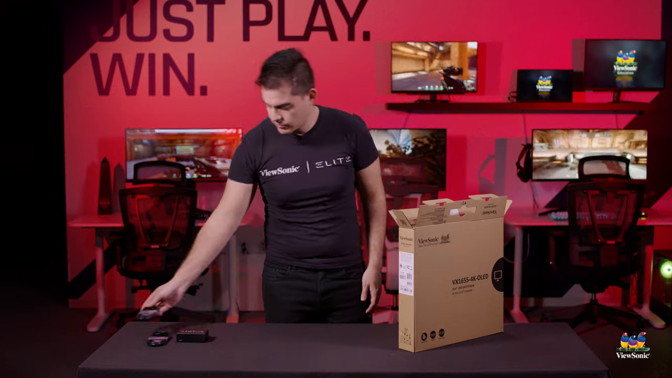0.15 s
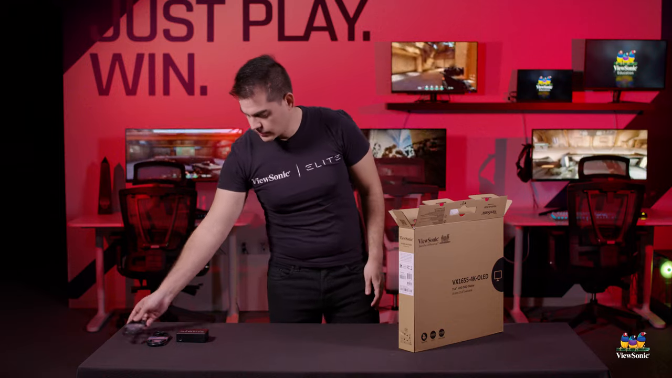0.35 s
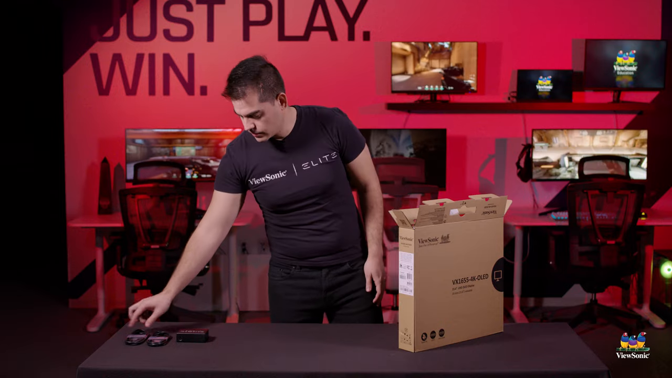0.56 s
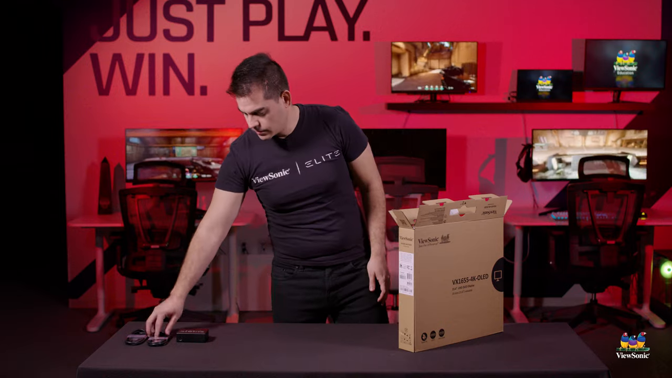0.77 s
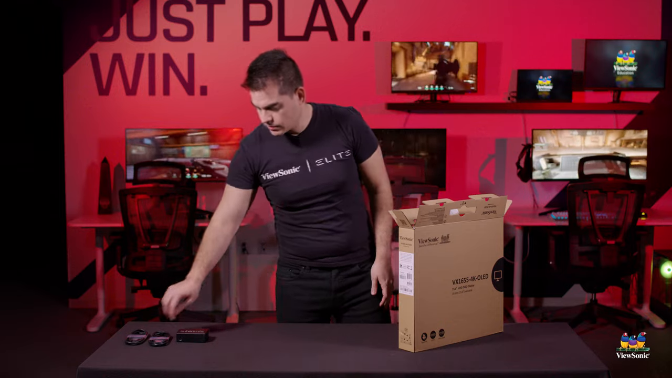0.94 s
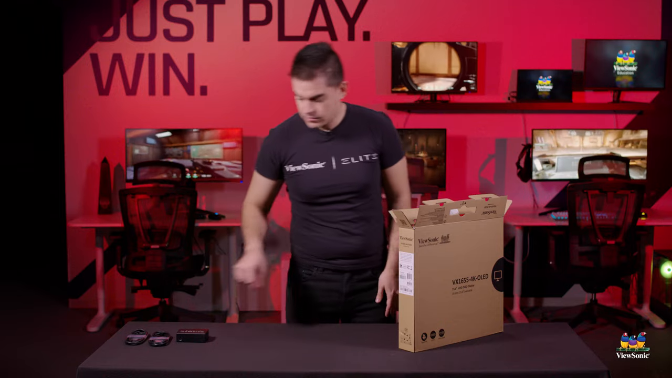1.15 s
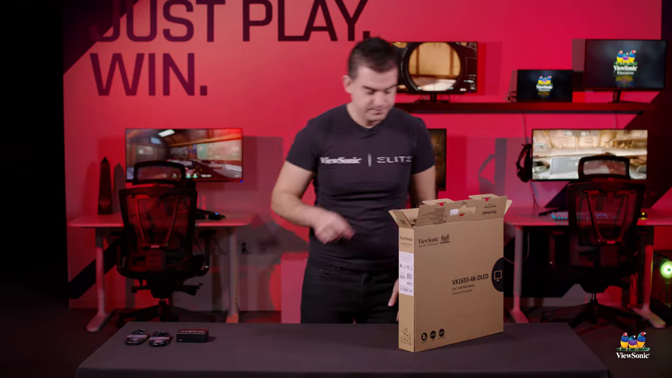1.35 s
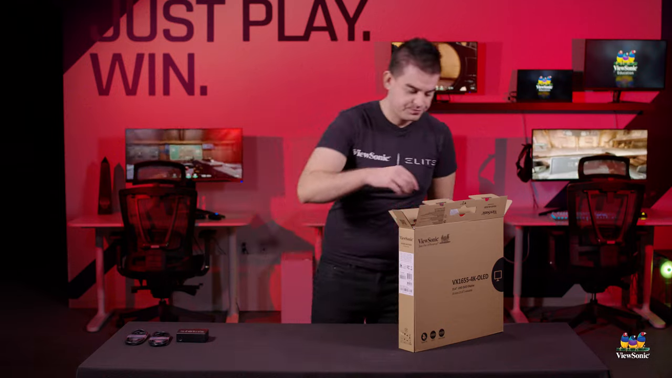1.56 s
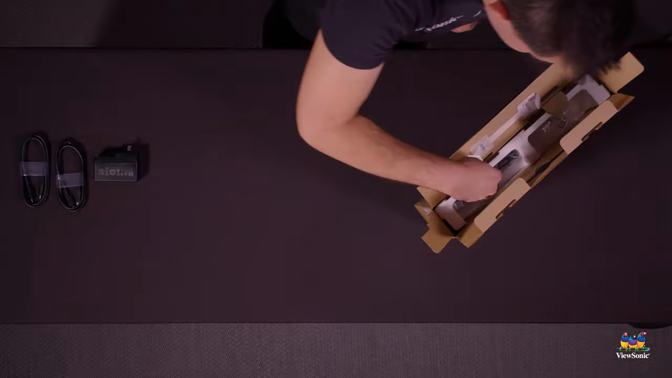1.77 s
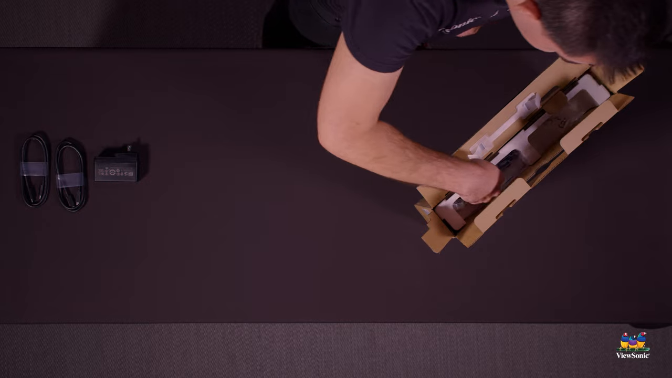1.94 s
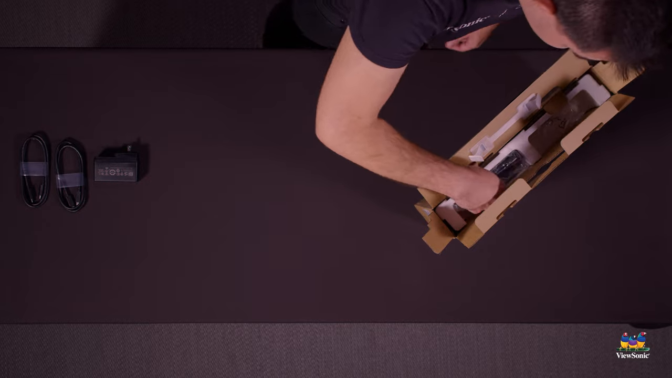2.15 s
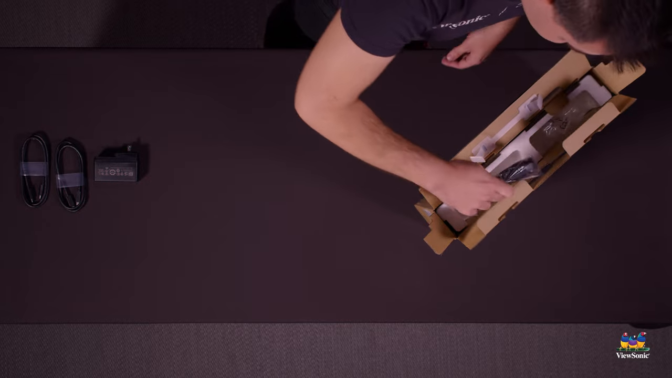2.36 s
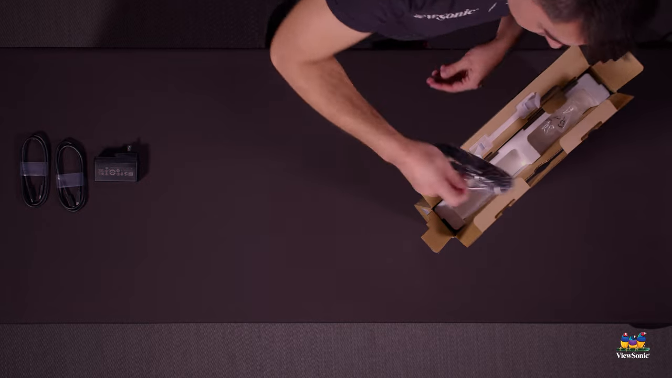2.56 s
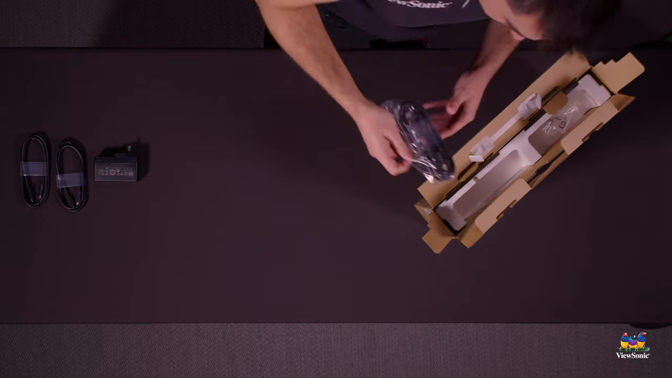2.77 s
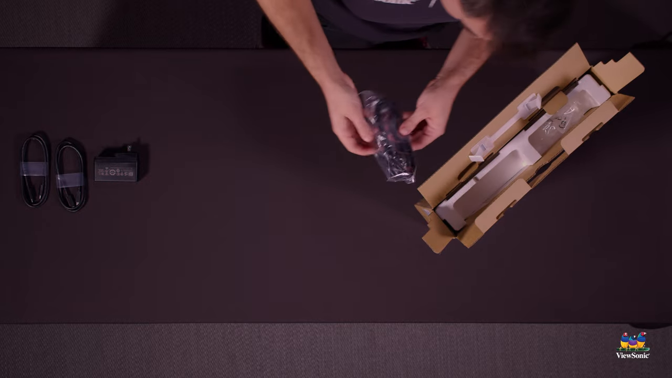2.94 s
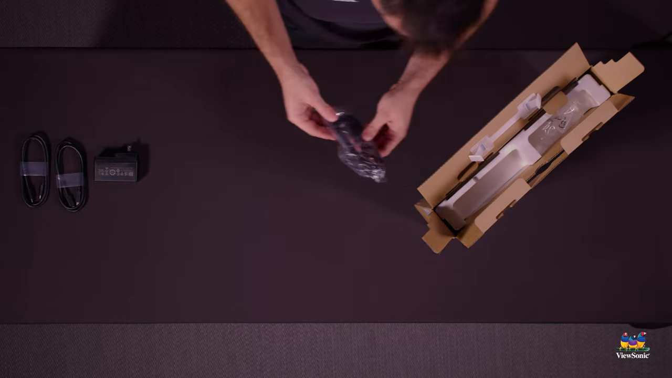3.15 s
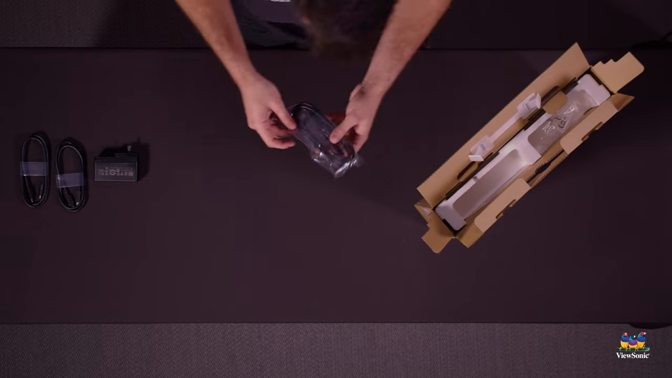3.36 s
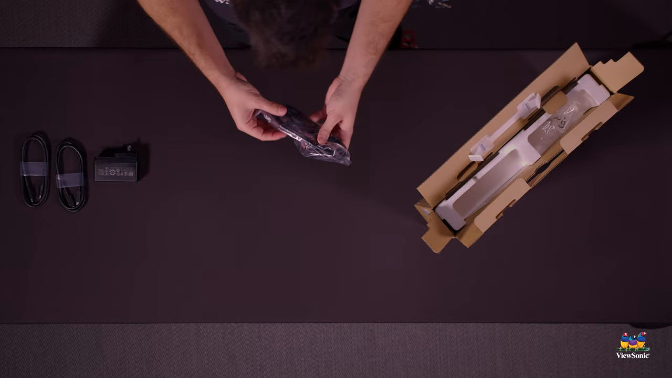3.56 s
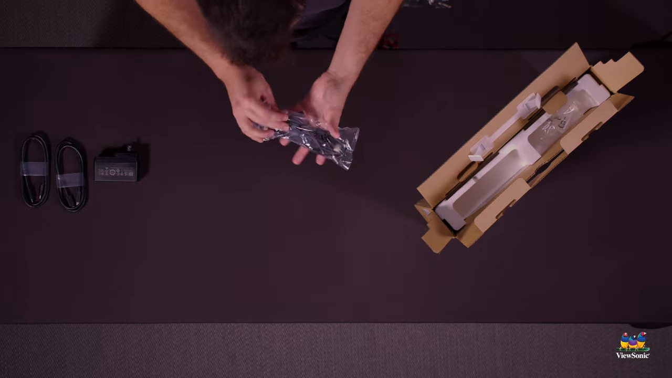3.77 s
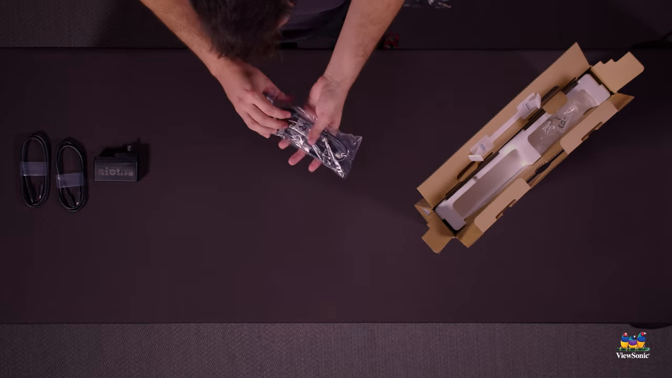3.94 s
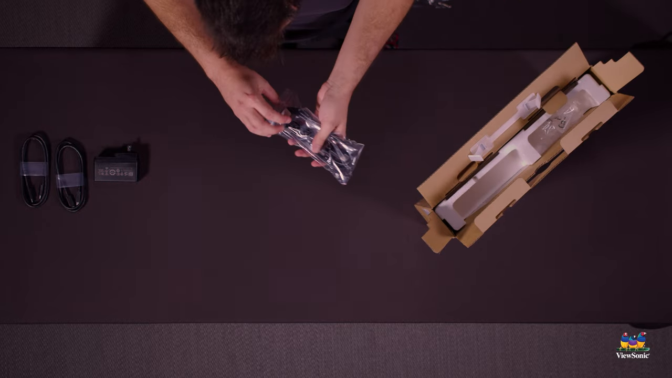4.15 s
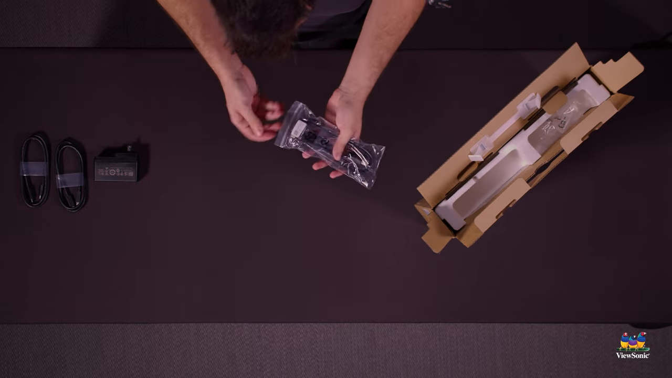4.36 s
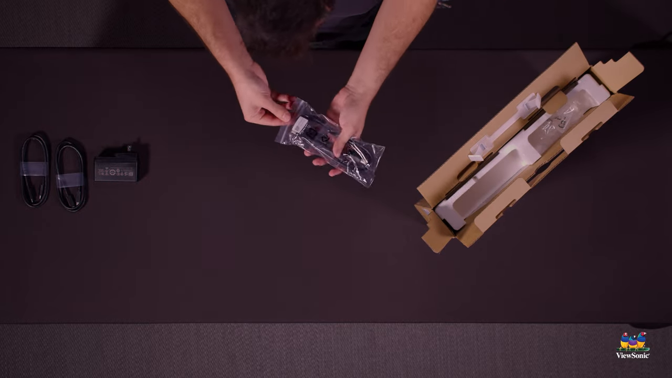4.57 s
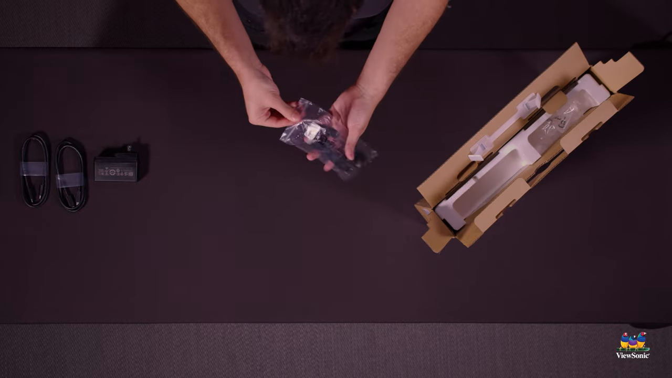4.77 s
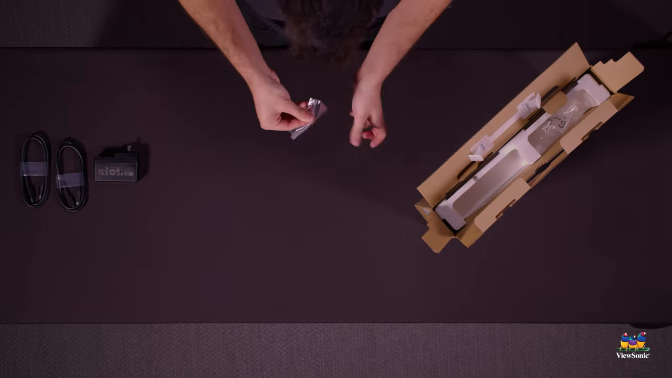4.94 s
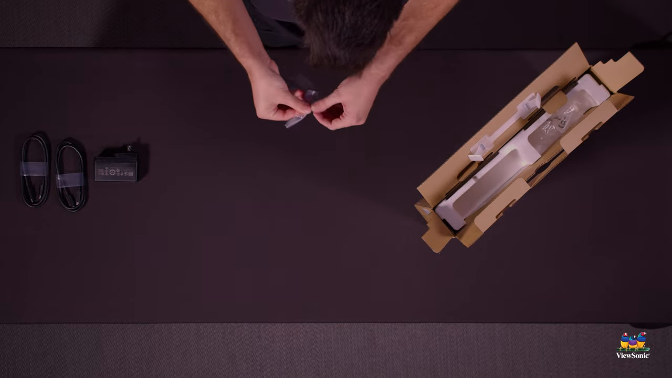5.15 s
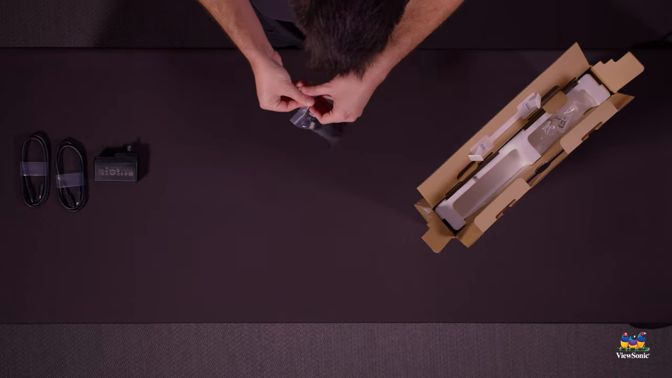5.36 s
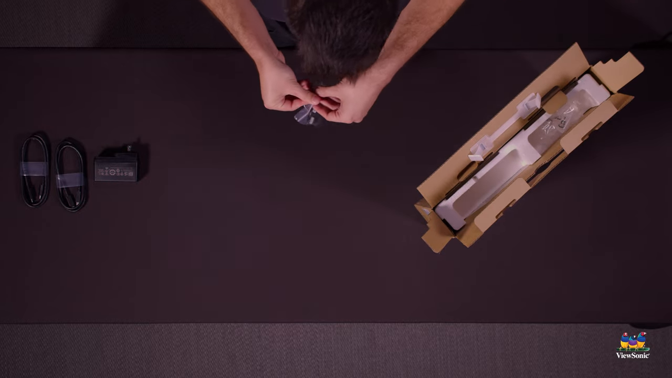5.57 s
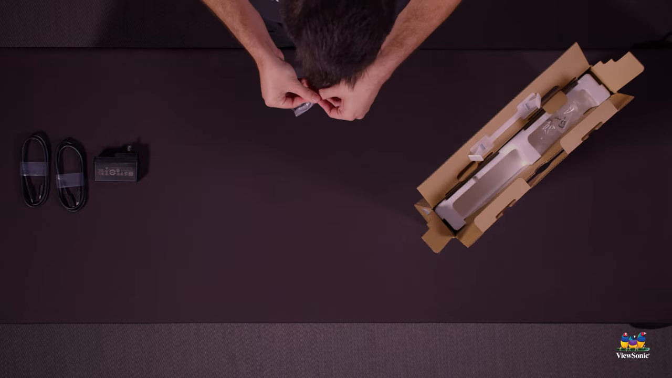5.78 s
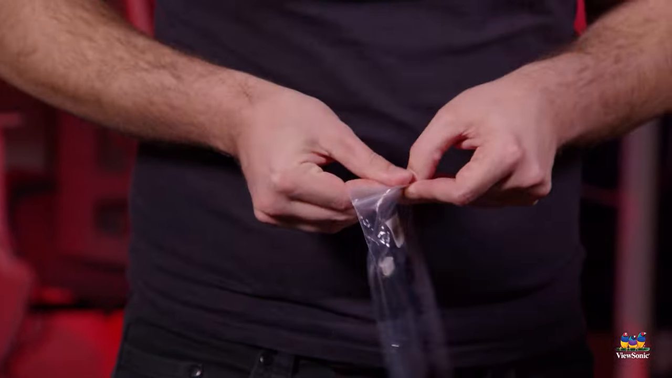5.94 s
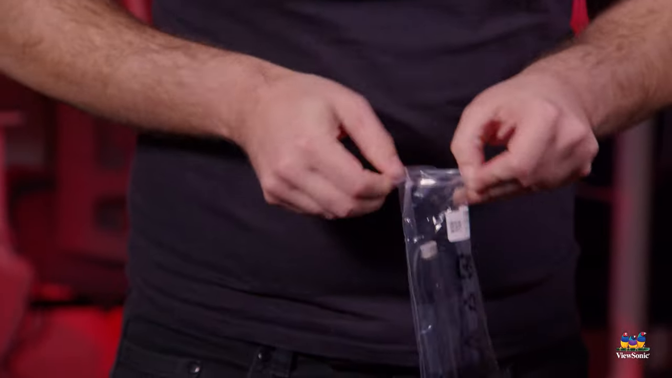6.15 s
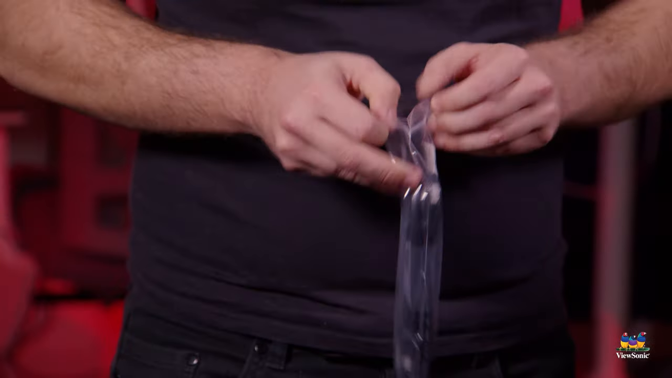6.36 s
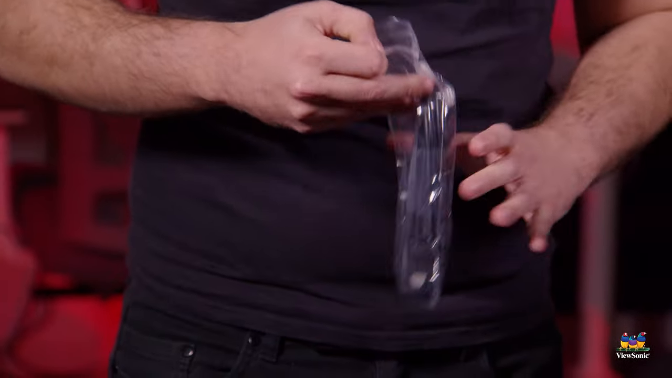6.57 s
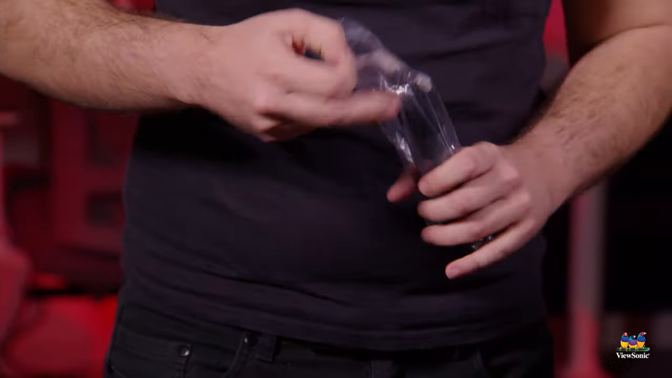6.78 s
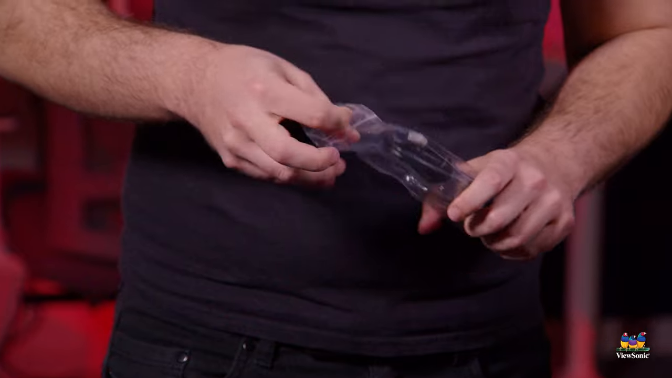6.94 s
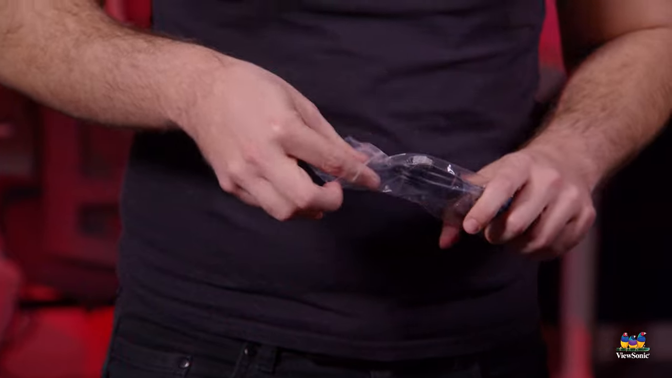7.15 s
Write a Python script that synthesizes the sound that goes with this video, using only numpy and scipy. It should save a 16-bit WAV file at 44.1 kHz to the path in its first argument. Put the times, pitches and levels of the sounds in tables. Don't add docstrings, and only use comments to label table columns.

```python
import sys
import numpy as np
from scipy import signal
from scipy.io import wavfile
from scipy.ndimage import uniform_filter1d

SR = 44100
rng = np.random.default_rng(int(sys.argv[2]) if len(sys.argv) > 2 else 0)


def voltage_ratio(decibels):
    exponent = np.asarray(decibels, float) / 20
    return 10 ** exponent


def master(y):
    cut = np.clip(np.atleast_2d(y).T, -1, 1)
    pcm = np.round(cut * 32767)
    wavfile.write(sys.argv[1], SR, pcm.astype(np.int16))


N = 317961
LEAD_S = .003


def evened(x):
    return x / np.sqrt(np.mean(x ** 2) + 1e-20)


def peaked(x):
    return x / np.sqrt(uniform_filter1d(x ** 2, size=50).max())


def read(points, hz):
    f, value = np.transpose(points)
    return np.interp(np.log(hz + 1), np.log(f + 1), value)


def curve(rows, column):
    rows = np.asarray(rows)
    return np.interp(np.arange(N) / SR, rows[:, 0], rows[:, column], -120, rows[-1, column])


def add(mix, s, sound):
    part = mix[round(s * SR):][:len(sound)]
    part += sound[:len(part)]


def band(x, lo_hz, hi_hz, order=2):
    sos = signal.butter(order, [lo_hz, min(hi_hz, .45 * SR)], "bandpass", fs=SR, output="sos")
    return signal.sosfilt(sos, x)


def resonate(x, hz, width):
    turn = np.exp(2j * np.pi * np.cumsum(hz * np.ones(len(x))) / SR)
    r = np.exp(-np.pi * np.mean(width) / SR)
    return 2 * (turn * signal.lfilter([1 - r], [1, -r], x / turn)).real


def flicker(seconds):
    size = max(int(seconds * SR), 2)
    return evened(uniform_filter1d(uniform_filter1d(rng.standard_normal(N), size), size))


def crackle(per_s, spread_db, clump_db, cycles, lo_hz, hi_hz, count=14):
    rate = per_s / SR * voltage_ratio(clump_db * np.clip(flicker(0.004), -2, 2))
    size = voltage_ratio(spread_db * np.minimum(rng.exponential(1, N), 3))
    size = size * (rng.random(N) < rate) * rng.choice([-1., 1.], N)
    kind, t, out = rng.integers(0, count, N), np.arange(400) / SR, np.zeros(N)
    for k, hz in enumerate(np.geomspace(lo_hz, hi_hz, count)):
        age = t * hz / cycles
        grain = np.sin(2 * np.pi * hz * t) * age * np.exp(-age)
        out += signal.oaconvolve(size * (kind == k), grain / np.linalg.norm(grain))[:N]
    return out


def air():
    # (frequency [Hz], density [dB per Hz])
    noise_spectrum = [(20, -1), (50, 2), (90, 0), (135, 5.5), (220, -2), (320, -4), (500, -7), (1000, -12),
                      (1600, -15), (3000, -19), (5500, -25), (8000, -25), (11000, -26), (15500, -30)]
    level_db = -57
    frames, hz = N // 256 + 5, np.fft.rfftfreq(1024, 1 / SR)
    a, b, patches = rng.standard_normal((frames, 513, 3)).T
    patches = evened(uniform_filter1d(uniform_filter1d(patches, 12, 0), 20, 1))
    z = (a + 1j * b) * voltage_ratio(read(noise_spectrum, hz)[:, None] + 0.23 * patches)
    return voltage_ratio(level_db) * evened(signal.istft(z, nperseg=1024, noverlap=768)[1][:N])


def room(x):
    # (frequency [Hz], t60 [s])
    decay = [(200, 0.51), (1500, 0.45), (5000, 0.35), (14000, 0.14)]
    taps = np.zeros(SR // 2)
    at = np.arange(130, len(taps) - 20, 20)
    taps[at + rng.integers(0, 20, len(at))] = rng.choice([-1., 1.], len(at))
    hz, t, z = signal.stft(taps, SR, nperseg=128)
    fade = voltage_ratio(-60 * t / np.maximum(read(decay, hz), .02)[:, None])
    tail = signal.istft(z * fade, SR, nperseg=128)[1]
    return signal.fftconvolve(x, tail / np.linalg.norm(tail))[:N]


def cable():
    # (time [s], level [dB])
    settling = [
        (.479, -64),
        (.483, -34),
        (.5, -39),
        (.52, -35.5),
        (.55, -41),
        (.62, -47.5),
        (.7, -58),
        (.8, -74),
    ]
    # (frequency [Hz], width [Hz], level [dB])
    modes = [(700, 200, -13), (974, 140, -5.5), (1400, 160, -3), (1680, 196, 1.5), (2400, 260, -14),
             (2850, 180, -9)]
    knocks = crackle(1500, 1.3, 3.0, 0.46, 640, 3160, count=6)
    ring = sum(voltage_ratio(db) * resonate(resonate(knocks, hz, 2 * width), hz, width) for hz, width, db in modes)
    on = slice(round(settling[0][0] * SR), round(settling[-1][0] * SR))
    out = np.zeros(N)
    out[on] = evened(ring[on]) * voltage_ratio(curve(settling, 1)[on])
    return out


def tick(db, hz, pop_db, pop_hz):
    t = np.arange(500) / SR
    ring = np.sin(2 * np.pi * hz * t) * np.exp(-t / .00025) * (1 - np.exp(-t / .0001))
    ring = ring + 0.042 * band(rng.standard_normal(len(t)) * np.exp(-t / 0.0049), 0.7 * hz, 20200)
    dull = band(rng.standard_normal(len(t)) * np.exp(-t / 0.0027), 0.84 * pop_hz, 1.08 * pop_hz)
    return voltage_ratio(db) * (ring / abs(ring).max() + voltage_ratio(pop_db) * dull / abs(dull).max())


def table_contacts():
    # (time [s], peak [dB], pitch [Hz], low pop against the tick [dB], pop pitch [Hz])
    touches = [(0.43, -22, 12900, -42, 2700), (0.437, -31, 12900, -36, 2700),
               (0.4444, -42, 9700, -28, 2700), (0.4567, -12, 7850, -42, 5000),
               (0.4821, -16.5, 10200, -3.5, 3020), (0.565, -41, 13600, 10, 2350),
               (0.599, -22.5, 13000, -12, 3350), (0.679, -40, 3000, 2.5, 1180),
               (0.7989, -21.5, 8500, -24.5, 3200), (1.0308, -43.5, 11400, -7.5, 3440),
               (6.035, -33.5, 4300, -19, 4200)]
    out = np.zeros(N)
    for s, *row in touches:
        add(out, s, tick(*row))
    return out


def thump(db, hz, t60):
    t = np.arange(SR // 3) / SR
    rough = evened(resonate(resonate(rng.standard_normal(len(t)), hz, .5 * hz), hz, .5 * hz))
    boom = (np.sin(2 * np.pi * hz * t) + .7 * rough) * (1 - np.exp(-t * hz / 1.5))
    boom = boom * voltage_ratio(-60 * t / max(t60, .03))
    return voltage_ratio(db) * boom / abs(boom).max()


def box_walls():
    # (time [s], peak [dB], pitch [Hz], t60 [s])
    pushes = [
        (2.041, -39.5, 114, 0.083),
        (2.249, -42.5, 116, 0.16),
        (2.38, -33, 148, 0.21),
        (2.476, -27, 134, 0.057),
        (2.92, -44, 117, 0.1),
        (4.686, -42, 303, 0.14),
        (4.817, -30, 245, 0.051),
        (6.198, -44.5, 87, 0.072),
    ]
    # (time [s], peak [dB], pitch [Hz], t60 [s])
    flaps = [
        (0.4817, -15, 1554, 0.028),
        (2.159, -16, 940, 0.043),
        (2.306, -23.5, 700, 0.043),
        (2.976, -34.5, 637, 0.029),
        (3.159, -43, 630, 0.032),
        (4.696, -36, 700, 0.047),
        (4.827, -23.5, 960, 0.026),
    ]
    out = np.zeros(N)
    for s, *row in pushes + flaps:
        add(out, s, thump(*row))
    return out


def hollow(rows):
    s, db, hz, width = np.transpose(rows)
    t = np.arange(s[0], s[-1], 1 / SR)
    hz = np.interp(t, s, hz)
    tone = resonate(resonate(rng.standard_normal(len(t)), hz, width), hz, 2 * width)
    return s[0], voltage_ratio(np.interp(t, s, db)) * evened(tone)


def cavities():
    # (time [s], level [dB], pitch [Hz], width [Hz])
    slides = [
        [(1.51, -56, 684, 117), (1.57, -50.5, 637, 120), (1.64, -64, 716, 120)],
        [(6.84, -69, 337, 50), (6.86, -49, 330, 50), (6.94, -48, 335, 50), (7.03, -57, 313, 50)],
        [(6.9, -58, 428, 60), (6.93, -53, 430, 60), (7.02, -50, 446, 60), (7.14, -62, 435, 60)],
    ]
    out = np.zeros(N)
    for rows in slides:
        add(out, *hollow(rows))
    return out


def squeeze(column):
    # (start [s], length [s], effort [dB], low pops against it [dB], hollow body against it [dB])
    efforts = [(1.938, 0.048, -58, 5.5, 5), (2.014, 0.11, -46, 7, -3.5), (2.149, 0.034, -36, 0.5, -21),
               (2.184, 0.11, -53.5, -4, 11.5), (2.288, 0.05, -37.5, -2, -22), (2.369, 0.19, -39, -5, -3.5),
               (2.751, 0.16, -49.5, -5.5, -12), (2.903, 0.13, -46.5, 2, -5), (3.127, 0.047, -46.5, 0.5, -7),
               (3.277, 0.02, -41, -3.5, -10.5), (3.376, 0.27, -48, 1, -8.5), (3.679, 0.18, -43, 0.5, -11.5),
               (3.959, 0.13, -45, -2.5, -12), (4.146, 0.032, -54, 4.5, -1), (4.342, 0.4, -71, -1.5, 7),
               (4.673, 0.036, -41, -2.5, -8.5), (4.776, 0.084, -39.5, -2.5, -9),
               (5.347, 0.19, -65.5, 1, -2), (5.585, 0.051, -54, -2.5, -19), (6.092, 0.11, -40, -1, -13.5),
               (6.254, 0.14, -51, 1.5, -9), (6.441, 0.056, -44, -3, -7.5), (6.763, 0.19, -47, -4.5, -3.5),
               (6.978, 0.23, -54, 3, 4.5)]
    tighten_db_per_s, relax_db_per_s = 983, 153
    let_go_db = 4.5
    t, power = np.arange(0, N, 64) / SR, 0
    for start, length, effort_db, *against_db in efforts:
        off_db = tighten_db_per_s * np.maximum(start - t, 0)
        off_db += relax_db_per_s * np.maximum(t - start - length, 0)
        off_db += let_go_db * (t > start + length)
        power = power + voltage_ratio(effort_db + ([0] + against_db)[column - 1] - off_db) ** 2
    return np.interp(np.arange(N) / SR, t, np.sqrt(power))


def big_snaps():
    # (time [s], bright crack [dB], low pop [dB], crack pitch [Hz])
    pulled_out = [(1.952, -35, -31, 13500), (1.9564, -35, -27, 12700), (1.965, -36, -46, 9050),
                  (1.9688, -33, -27, 11100.0), (2.007, -40, -51, 13000), (2.0143, -42, -41, 9500.0),
                  (2.0323, -41, -42, 10300.0), (2.069, -34, -40, 12400.0), (2.0765, -27, -21, 9500),
                  (2.0798, -30, -29, 10900.0), (2.0979, -26, -30, 10200), (2.1084, -17.5, -20, 12700),
                  (2.1118, -30, -23, 12000), (2.1188, -32, -25, 11400.0), (2.128, -28, -30, 12900.0),
                  (2.1346, -28, -31, 8100.0), (2.1629, -28, -18, 7500.0), (2.2267, -27.5, -40, 8700.0),
                  (2.2541, -36, -26.5, 11200.0), (2.297, -44, -35, 10200.0), (2.306, -38, -31, 10400.0),
                  (2.311, -22.5, -21.5, 10700), (2.3233, -36, -24, 7500.0), (2.3518, -28.5, -37, 10300),
                  (2.382, -26.5, -20, 10400), (2.4109, -35, -17.5, 9300), (2.4219, -19, -22.5, 9500),
                  (2.456, -21.5, -18.5, 9300), (2.4617, -40, -34, 6900.0), (2.472, -26, -24.5, 10700.0),
                  (2.491, -27, -28, 9400.0), (2.4988, -24, -22, 9300.0), (2.5035, -23, -20, 9400),
                  (2.5118, -34, -31, 7700.0), (2.5162, -27, -20.5, 9300.0), (2.5307, -31, -25, 8100.0),
                  (2.5333, -28, -27, 8550), (2.54, -36, -28, 8900.0), (2.544, -41, -26, 5100.0),
                  (2.5506, -40, -40, 7900.0), (2.5666, -38, -41, 10500), (2.5753, -26.5, -30, 10900),
                  (2.5943, -32, -22, 9800), (2.599, -38, -24.5, 7950), (2.6288, -33.5, -31, 10000.0),
                  (2.65, -35, -53, 10800), (2.678, -35.5, -31, 9600)]
    turned_over = [(2.726, -40, -37, 10600), (2.762, -39, -40, 10900), (2.7843, -37, -33, 6150),
                   (2.8003, -42, -28.5, 8260), (2.854, -35, -37, 11300), (2.8806, -33.5, -31.5, 11400),
                   (2.925, -28.5, -29, 10800), (2.929, -28.5, -33, 9100.0), (2.9401, -28, -24.5, 9200.0),
                   (2.9784, -34, -31, 11100.0), (2.994, -33, -33, 10200.0), (2.9979, -44, -33, 9100.0),
                   (3.0245, -25, -24.5, 11700), (3.037, -38, -41, 7500.0), (3.1437, -45, -28, 9100.0),
                   (3.1576, -26.5, -30.5, 11000), (3.198, -30, -32.5, 11400), (3.2516, -27.5, -30, 10700),
                   (3.2978, -38, -24, 10300.0), (3.304, -24.5, -31, 10800), (3.3263, -36, -39, 8400),
                   (3.3515, -33, -30, 11100.0), (3.3706, -32, -47, 10500.0), (3.384, -28, -58, 5900),
                   (3.3906, -29, -35, 8160), (3.408, -27, -54, 5800), (3.417, -43, -52, 7440),
                   (3.44, -26.5, -37, 9200), (3.4476, -28.5, -32, 9200), (3.461, -33, -30, 8800.0),
                   (3.481, -36, -45, 8650), (3.4975, -27.5, -27.5, 11400), (3.5056, -34, -31, 11200.0),
                   (3.5084, -31, -37, 8600.0), (3.531, -26, -26, 6750), (3.54, -36, -33, 10400.0),
                   (3.544, -34, -38, 7500.0), (3.555, -28.5, -32, 9200), (3.5716, -34, -28.5, 10400.0),
                   (3.5834, -31.5, -35, 9300.0), (3.5954, -33, -33, 7500.0), (3.61, -30.5, -49, 9200),
                   (3.6224, -40, -32.5, 7100.0), (3.6435, -27, -37, 10900.0), ]
    smoothed = [(3.6745, -35, -30, 7500.0), (3.6952, -27, -38, 8700.0), (3.707, -28, -31, 12900),
                (3.7105, -30, -22.5, 10000.0), (3.7212, -28, -24.5, 9100.0), (3.7365, -26, -31, 9600.0),
                (3.754, -38, -31, 8100.0), (3.7677, -24.5, -24.5, 10100), (3.7755, -32, -47, 11500.0),
                (3.7894, -38, -48, 8800.0), (3.8308, -33, -38, 8900.0), (3.8493, -22.5, -25, 6300),
                (3.859, -29, -42, 6900.0), (3.878, -34, -28, 8900), (3.891, -33, -34, 9800.0),
                (3.911, -29, -31, 8700.0), (3.938, -31.5, -32, 8300.0), (3.9544, -33, -33, 12200),
                (3.965, -29, -29, 10300.0), (3.974, -25, -30, 10100.0), (3.986, -24, -26.5, 9800),
                (4.0002, -32, -30, 8600.0), (4.011, -32, -25.5, 12200.0), (4.015, -31, -41, 9400.0),
                (4.046, -33.5, -24, 9400.0), (4.059, -46, -29, 10300.0), (4.0726, -21, -29, 11300),
                (4.089, -27, -30, 8700.0), (4.0951, -21, -25, 9400), (4.108, -26, -29, 9600.0),
                (4.1139, -24, -22.5, 8800.0), (4.1252, -28, -38, 14200.0), (4.144, -34, -47, 11200.0),
                (4.1533, -31, -28.5, 9400.0), (4.1628, -26, -30, 9400), (4.177, -28, -28.5, 9100),
                (4.1984, -37, -30, 10300.0)]
    picked_at = [(4.263, -50, -50, 13500), (4.272, -60, -49, 13500), (4.331, -60, -51, 10300),
                 (4.367, -54, -52, 13000), (4.376, -47.5, -48, 10600), (4.3879, -63, -48, 8200.0),
                 (4.403, -55, -57, 7800), (4.473, -52, -53, 9400.0), (4.5463, -50, -48, 7500.0),
                 (4.5556, -44, -49, 10000), (4.5709, -45, -49, 10400), (4.579, -51, -58, 10500),
                 (4.626, -52, -41.5, 6300.0), (4.646, -49, -40.5, 10300.0), (4.667, -30.5, -47, 11400),
                 (4.6758, -36, -32, 11200), (4.683, -49, -39, 8600.0), (4.696, -36, -33, 10700.0),
                 (4.7033, -26, -29.5, 12700), (4.7748, -34, -48, 7440), (4.7826, -29, -51, 9050),
                 (4.804, -35, -29, 9900.0), (4.81, -22.5, -31, 9400), (4.8168, -25, -33, 8800),
                 (4.828, -29.5, -19.5, 8100.0), (5.0169, -51, -56, 9600), (5.048, -53, -48, 7000.0),
                 (5.0643, -50, -45, 9000), (5.073, -50, -49, 10200), (5.0887, -42.5, -46, 8550),
                 (5.115, -49.5, -50, 9300), (5.197, -53, -54, 6840), (5.204, -58, -51, 7000),
                 (5.2237, -56, -50, 6100.0), (5.245, -54, -47, 6500), (5.325, -62, -45.5, 7100.0),
                 (5.3313, -61, -46, 7650), (5.3507, -55, -48, 7100.0), (5.372, -44, -60, 10000),
                 (5.3757, -48, -43, 8900.0), (5.3857, -58, -51, 10000.0), (5.395, -46, -53.5, 7740),
                 (5.415, -45, -57, 10500.0), (5.424, -50, -45, 8600.0), (5.443, -49, -58, 7500),
                 (5.468, -65, -41.5, 6300.0), (5.5426, -30.5, -28.5, 7100), (5.573, -31.5, -33, 7150),
                 (5.6127, -36.5, -47, 10800), (5.876, -57, -56, 9000), (5.9138, -48, -51, 7700.0),
                 (5.9307, -44, -45.5, 8800), (5.9682, -37.5, -60, 9200)]
    opened = [(6.057, -48, -60, 8500), (6.0718, -25.5, -33, 8450), (6.0902, -26, -36, 9500),
              (6.1083, -25, -47, 9600.0), (6.1138, -30, -50, 8500.0), (6.133, -34, -30, 10100.0),
              (6.1524, -25, -34, 9500), (6.178, -31, -26, 9200), (6.237, -38, -43, 9450),
              (6.2723, -36, -42, 9900.0), (6.3155, -39.5, -35.5, 9600.0), (6.3425, -35, -43, 9500.0),
              (6.3633, -38, -37, 9500), (6.4381, -29.5, -37, 10800.0), (6.4552, -25, -28, 7200),
              (6.468, -27, -26.5, 9000.0), (6.5101, -31.5, -30, 7950), (6.5426, -44, -34, 10000.0),
              (6.578, -32, -35, 10300), (6.6013, -48, -39, 7400.0), (6.6536, -62, -37.5, 4900.0),
              (6.763, -32, -58, 8750), (6.7802, -31.5, -53, 10500.0), (6.7877, -33, -46, 9700),
              (6.842, -32.5, -29, 9200), (6.862, -33, -29, 11200.0), (6.8713, -29, -40, 10900.0),
              (6.8816, -26.5, -28, 8800), (6.891, -34, -33, 9800.0), (6.921, -49, -24, 6200.0),
              (6.9268, -28, -39, 9500.0), (6.9313, -20.5, -24, 9050), (7.0346, -33, -34, 10800),
              (7.0428, -31, -37, 8200), (7.055, -33, -44, 11500), (7.0634, -35, -30, 7500.0),
              (7.083, -29.5, -49, 11700), (7.1109, -29, -30, 10900), (7.1356, -31, -34, 11400),
              (7.1393, -32, -33.5, 10700.0), (7.1603, -39, -34.5, 7300), (7.1749, -34, -46, 9500),
              (7.1876, -35, -32, 11200)]
    spreads = [1.6, 1.2, 0.96, 1.6, 1.1]
    lag_s = -.0002
    stages = zip((pulled_out, turned_over, smoothed, picked_at, opened), spreads)
    return [(s + lag_s, *row, spread) for rows, spread in stages for s, *row in rows]


def small_snaps():
    per_s = 170
    bright_over_db, pop_over_db, spread_db = 1, 2, 3.5
    s = np.sort(rng.uniform(0, N / SR - .02, round(per_s * N / SR)))
    at = (s * SR).astype(int)
    chance = spread_db * rng.standard_normal((len(s), 3))
    bright, pop = (20 * np.log10(squeeze(column=k)[at] + 1e-9) for k in (1, 2))
    hz = 9500 * voltage_ratio(np.tanh(chance[:, 2] / spread_db) * 3.2)
    return list(zip(s, bright + bright_over_db + chance[:, 0], pop + pop_over_db + chance[:, 1], hz))


def stir(column, after_s=0.0072, share_db=-15):
    rows, t, kicks = np.asarray(big_snaps()), np.arange(-1000, 3000) / SR, np.zeros(N)
    kicks[(rows[:, 0] * SR).astype(int)] = voltage_ratio(rows[:, column] + share_db) ** 2
    spreading = np.exp(np.where(t < 0, 2 * t / LEAD_S, -t / after_s))
    unrest = signal.oaconvolve(kicks, spreading)[1000:][:N]
    return np.sqrt(squeeze(column) ** 2 + abs(unrest))


def snap(bright_db, pop_db, hz, spread):
    t = np.arange(600) / SR - LEAD_S
    hiss, jolts, shove, luck = rng.standard_normal((4, 600))
    slips = 0.56 * voltage_ratio(5.6 * np.tanh(luck[0]) + 0.17 * (bright_db + 9.5))
    slips = slips * np.exp(np.where(t < 0, t / 0.00097, -t / 0.0027))
    tear = max(spread, .3) * voltage_ratio(3.6 * np.tanh(luck[2]))
    crack = np.exp(-np.where(t < 0, -t / (0.00036 * tear), t / (0.00033 * tear)) ** 1.2)
    ragged = voltage_ratio(4.8 * evened(uniform_filter1d(shove[::-1], size=12)))
    spray = hiss * (crack * ragged + slips * abs(jolts))
    spray = spray + 2.4 / tear * (abs(t) == abs(t).min())
    bright = 0.72 * band(spray, 4940, 11700) + band(spray, 0.81 * hz, 1.126 * hz)
    panel_hz = 2300 * voltage_ratio(1.54 * np.tanh(luck[1]))
    push = shove * (np.exp(np.where(t < 0, t / 0.00045, -t / (0.00041 * tear))) + 1.1 * slips)
    pop = band(push, 0.64 * panel_hz, 2.01 * panel_hz)
    return voltage_ratio(bright_db + 5.0) * peaked(bright) + voltage_ratio(pop_db + 0.92) * peaked(pop)


def coloured(x, patchy_db, depth):
    # (frequency [Hz], density [dB per Hz])
    in_box = [(410, -21), (700, -2.5), (2740, -7.5), (3890, -8), (5170, -20.5), (7740, 0.5), (13700, -1.5),
              (15600, 15)]
    unfolded = [(530, -79), (900, -36), (1010, -11.5), (1890, 1), (3770, -7), (9120, 1.5), (11000, -2.5),
                (13200, 5.5), (15600, -1)]
    pinched = [(530, -47), (1300, -3.5), (2150, 6.5), (2900, -4.5), (4600, -10.5), (7000, -1.5),
               (10600, 1.5), (12400, -10.5), (14200, -3.5), (15600, 2)]
    near_chest = [(530, -50), (900, -16.5), (1960, 6), (3190, 7.5), (5200, -6.5), (7180, 6.5), (9450, 7),
                  (11700, 9.5), (12900, -4), (15600, 4)]
    hz, t, z = signal.stft(x, SR, nperseg=128)
    stage = np.digitize(t, [2.4, 4.22, 6.04])
    gains = np.array([voltage_ratio(depth * read(s, hz)) for s in (in_box, unfolded, pinched, near_chest)])
    audible = (hz > 1200) & (hz < 15000)
    gains /= np.sqrt(np.mean(gains[:, audible] ** 2, axis=1, keepdims=True))
    folds = uniform_filter1d(rng.standard_normal((len(t), len(hz))), size=14, axis=0)
    folds = uniform_filter1d(folds, size=5, axis=1)
    z = z * gains[stage].T * voltage_ratio(patchy_db * evened(folds).T)
    return signal.istft(z, SR, nperseg=128)[1][:N]


def film():
    grains = evened(crackle(2600, 3.3, 5.5, 0.62, 1103, 15600, count=16)) + 0.49 * rng.standard_normal(N)
    bright, low = band(grains, 4700, 22200, order=3), band(grains, 820, 3800, order=3)
    sheet = 1.083 * (stir(column=1) * evened(bright) + stir(column=2) * evened(low))
    for s, *row in small_snaps():
        add(sheet, s - LEAD_S, snap(*row, spread=2.6))
    body = band(crackle(900, 5.8, 5.5, 0.76, 551, 1205, count=8), 475, 1250, order=3)
    body += 0.37 * np.std(body) * evened(band(rng.standard_normal(N), 237, 422))
    body *= stir(column=2) / uniform_filter1d(stir(column=2), size=2600)
    body[round(6.75 * SR):] *= .3
    cracks = np.zeros(N)
    for s, *row in big_snaps():
        add(cracks, s - LEAD_S, snap(*row))
    creases = coloured(sheet, 2.94, depth=0.56) + coloured(cracks, 0, depth=0.61)
    return creases + squeeze(column=3) * evened(body)


def scene():
    near = cable() + table_contacts() + box_walls() + cavities() + film()
    return (near + voltage_ratio(-14.0) * room(near) + air())[None]


def top_cut(x):
    return signal.sosfilt(signal.butter(12, 16810, fs=SR, output="sos"), x)


def record(dry):
    edge_hz = 15750
    lowpass = signal.firwin(255, edge_hz, window=("kaiser", 5), fs=SR)
    cut = signal.oaconvolve(dry, lowpass[None], "same")
    return top_cut(cut)


dry = scene()
out = record(dry)
master(out)
```